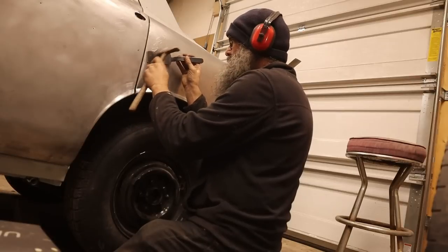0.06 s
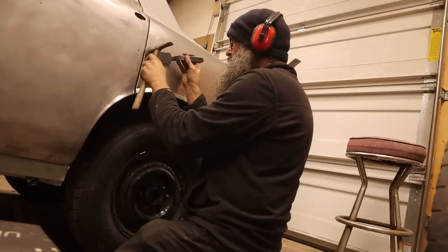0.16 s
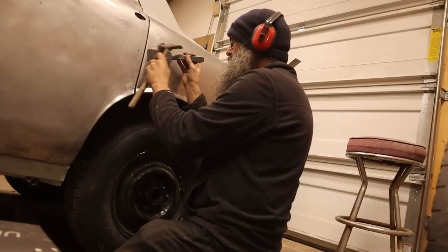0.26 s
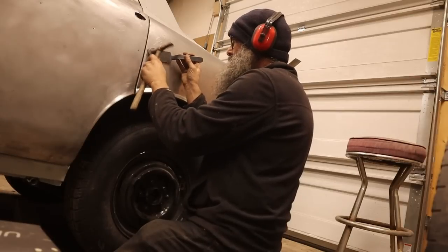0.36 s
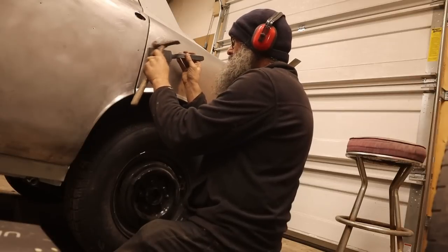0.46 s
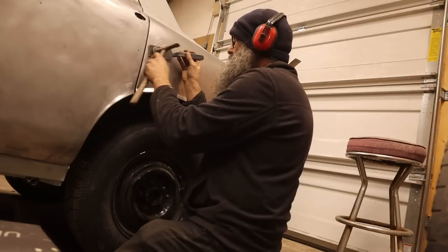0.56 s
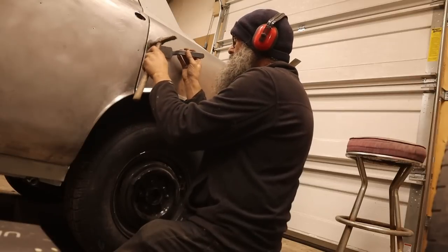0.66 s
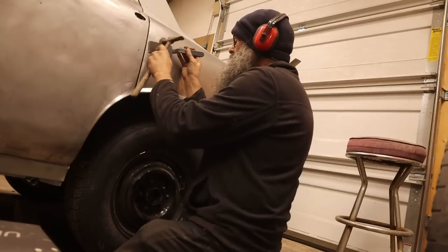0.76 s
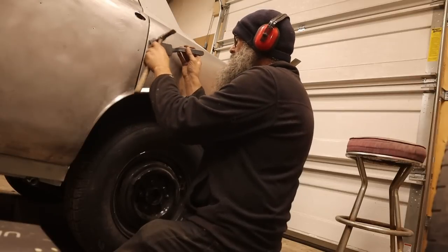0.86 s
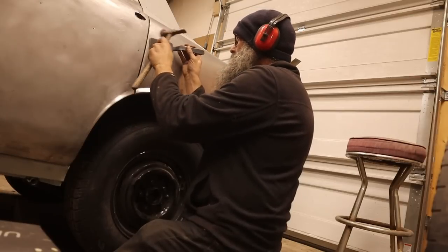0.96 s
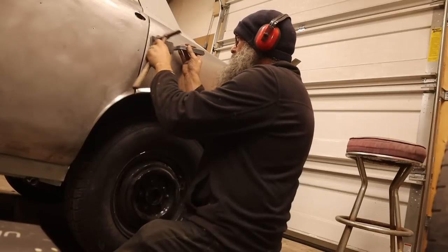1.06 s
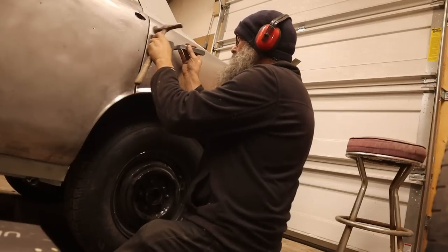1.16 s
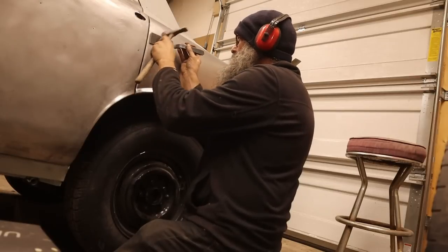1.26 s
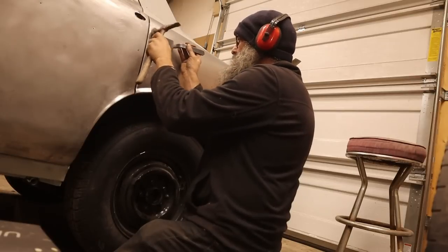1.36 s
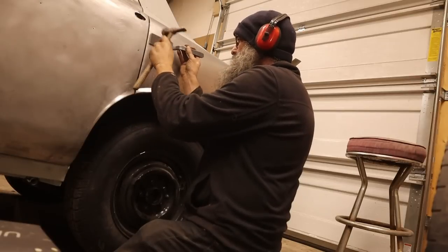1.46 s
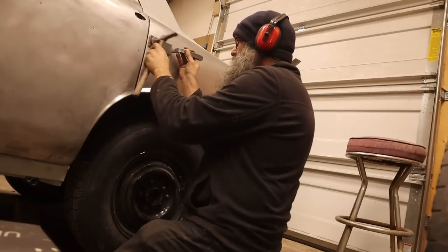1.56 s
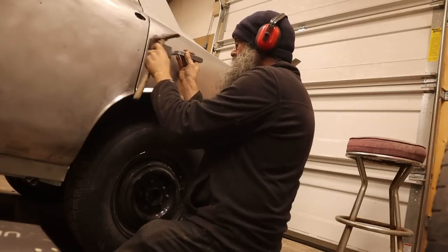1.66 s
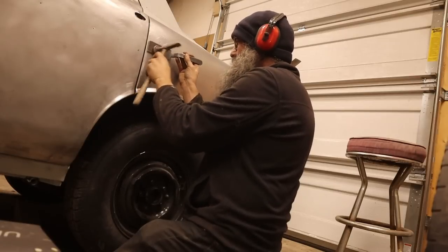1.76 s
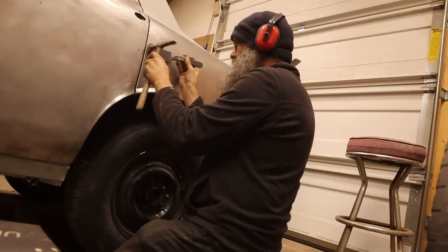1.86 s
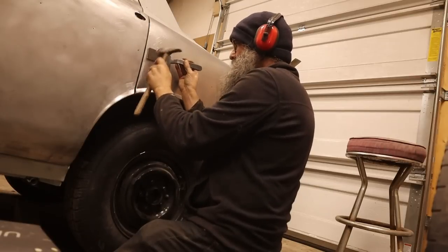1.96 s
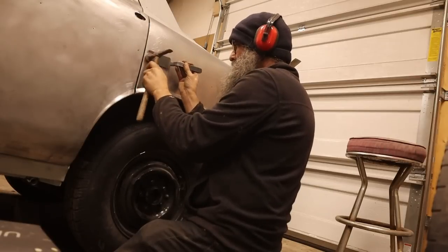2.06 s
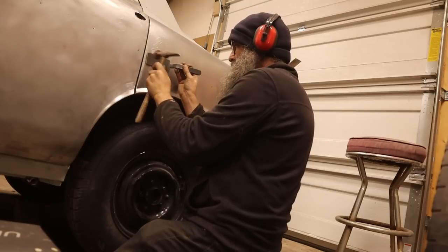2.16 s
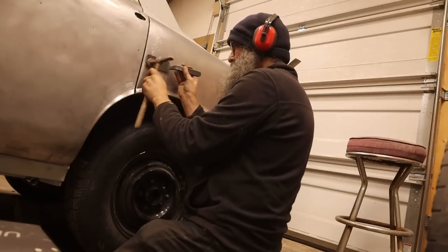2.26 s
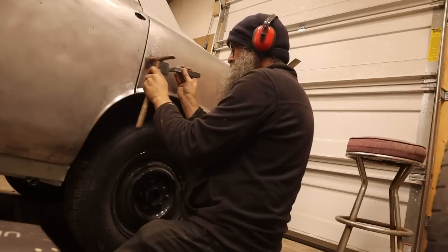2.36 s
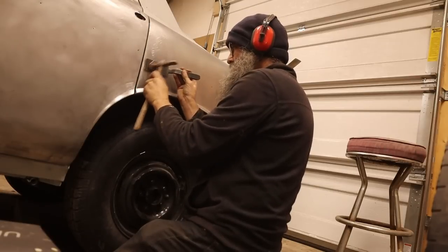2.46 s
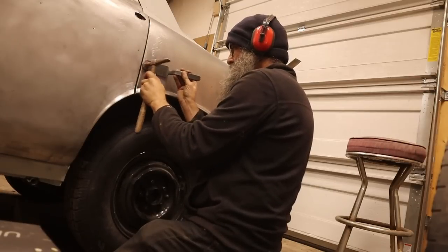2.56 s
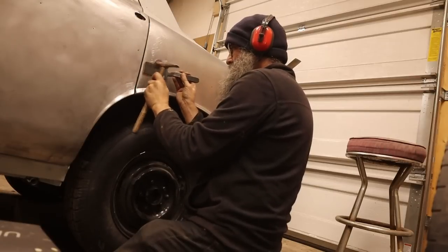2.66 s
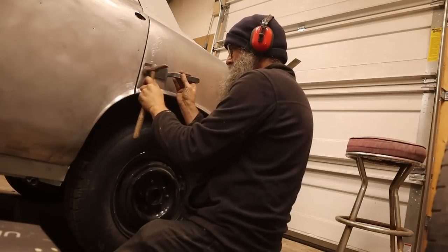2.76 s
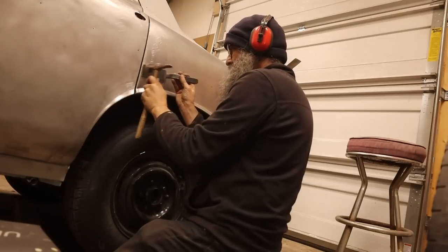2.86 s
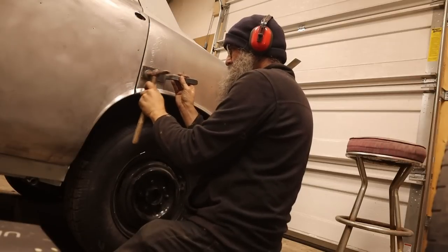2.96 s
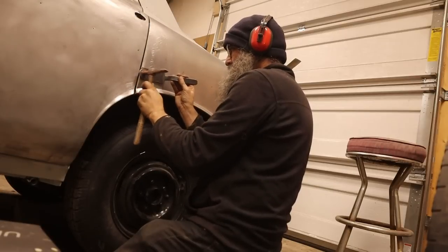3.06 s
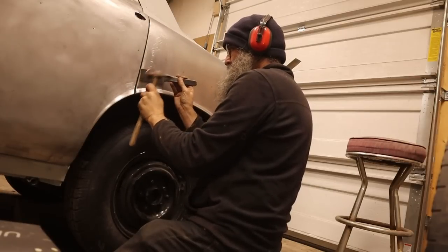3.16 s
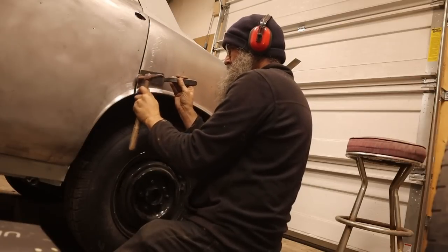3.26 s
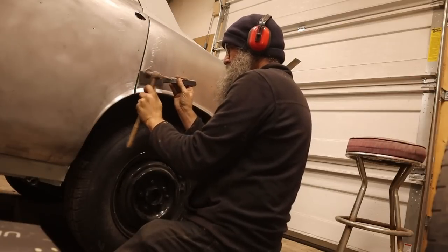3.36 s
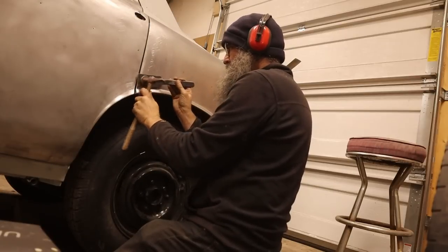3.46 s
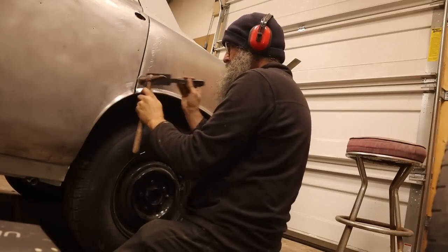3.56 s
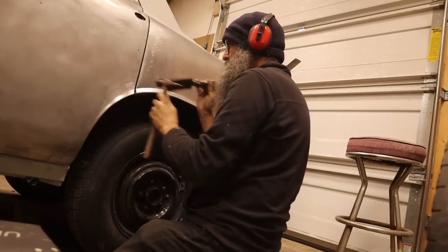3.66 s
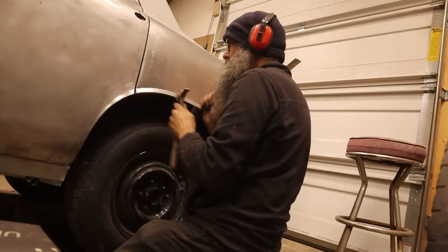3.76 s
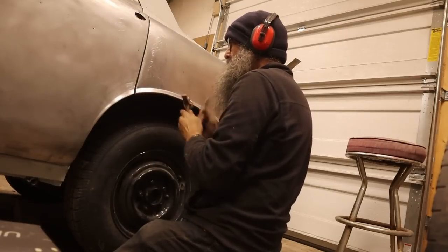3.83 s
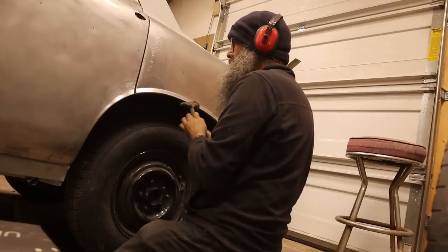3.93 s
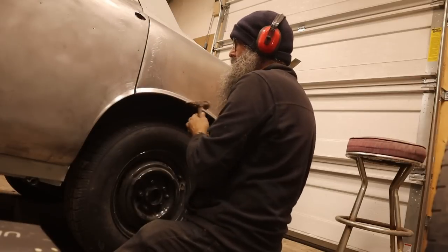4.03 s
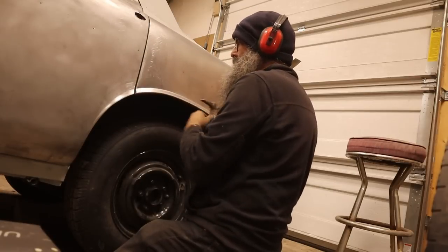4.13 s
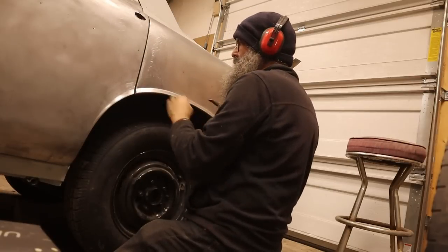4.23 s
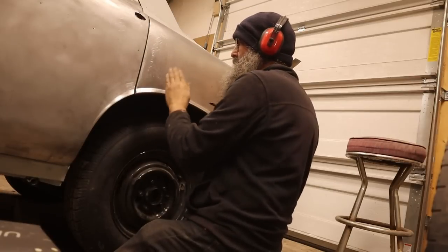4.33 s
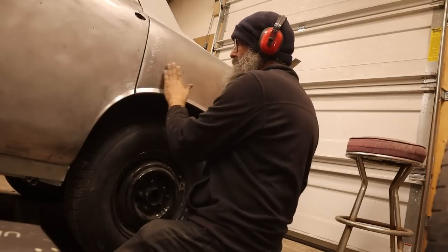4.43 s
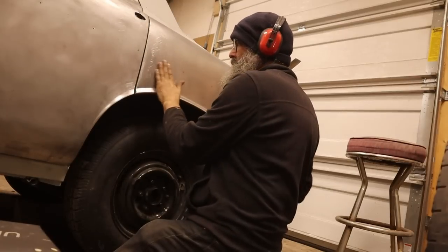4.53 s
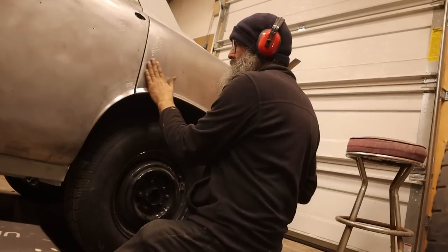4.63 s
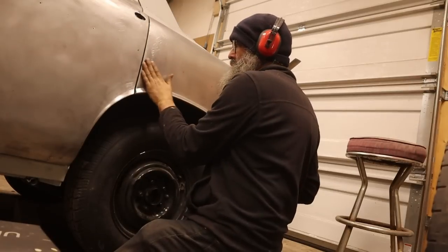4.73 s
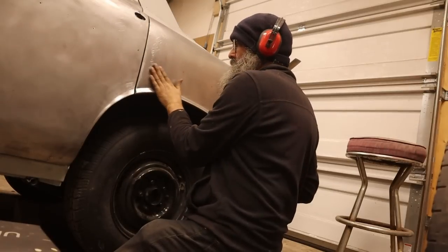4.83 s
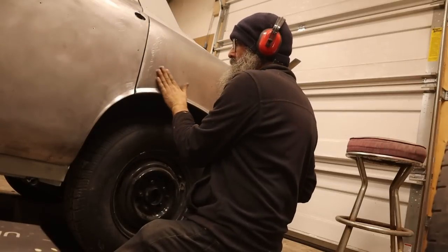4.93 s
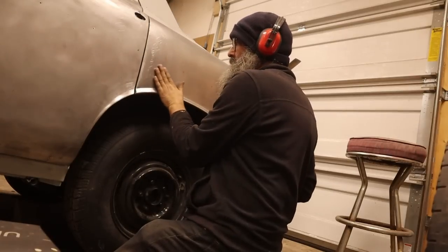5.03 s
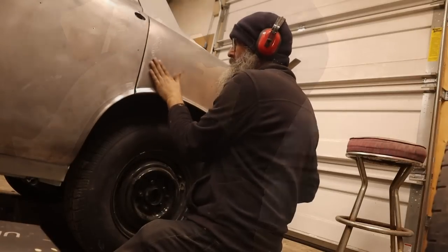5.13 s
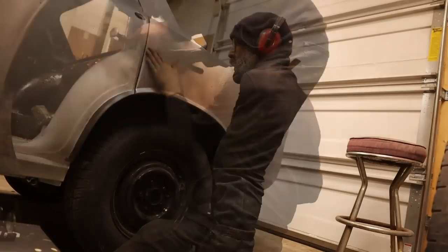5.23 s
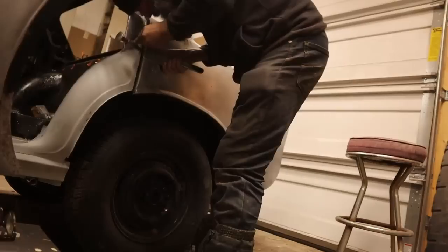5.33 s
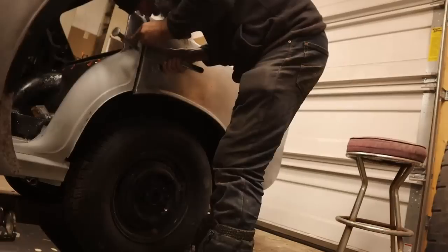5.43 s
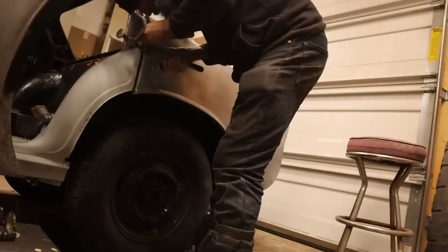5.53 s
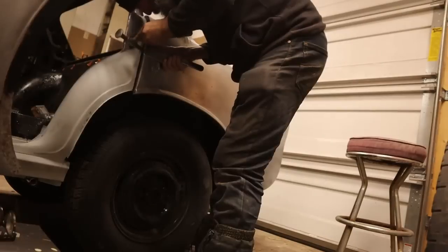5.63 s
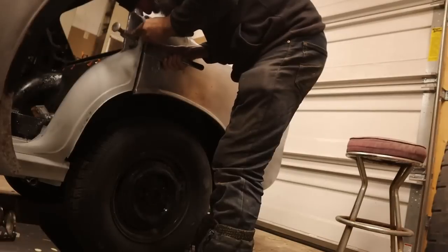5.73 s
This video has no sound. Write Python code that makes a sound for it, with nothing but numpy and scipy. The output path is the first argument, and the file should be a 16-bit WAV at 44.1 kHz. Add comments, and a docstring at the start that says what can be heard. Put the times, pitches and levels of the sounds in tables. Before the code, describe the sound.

A hammer taps a steel car panel against a hand-held steel block, about four times a second. Each tap is a bright clink over the boom and ring of the sheet, with a short garage echo. The tapping stops, the tools clink softly, and a palm lands and rubs very faintly on the metal. Then duller, clanging blows fade in at the same pace.

```python
"""Panel beating in a garage

A body hammer taps a steel wing against a dolly, four times a second: each tap is a bright steel clink
over the boom and clang of the panel, with the garage echoing the clink. The tools go down with a small
clink and a palm strokes the metal; then duller, heavier blows on the unbacked sheet fade in."""
import sys
import numpy as np
from scipy import signal
from scipy.io import wavfile

SR = 44100
rng = np.random.default_rng(int(sys.argv[2]) if len(sys.argv) > 2 else 0)


def persist_wave(psi):
    """Save psi, clipped to +-1, as 16-bit WAV."""
    counts = np.round(np.clip(psi, -1, 1) * 32767).astype(np.int16)
    wavfile.write(sys.argv[1], SR, np.atleast_2d(counts).T)


N = 255339
TIME, AGE = np.arange(N) / SR, np.arange(int(1.7 * SR)) / SR   # scene clock, time since a hit [s]
CRACK, SHORT, BODY = int(.005 * SR), int(.06 * SR), int(.15 * SR)   # stretches of a hit [samples]
EDGES = np.geomspace(35, 17000, 25)   # noise bands [Hz]
CENTRES = np.sqrt(EDGES[1:] * EDGES[:-1])
BANDS = [signal.butter(2, edge, "band", fs=SR, output="sos") for edge in zip(EDGES, EDGES[1:])]
NOISE = np.array([signal.sosfilt(band, rng.standard_normal(N + SR))[SR // 4:] for band in BANDS])


# How much the sheet gives as the hammer wanders over the wing to its lip (time [s], give [dB])
GIVE = [(0.15, 1), (1.37, 3), (1.85, 3.5), (2.1, 2), (3.05, -12), (3.54, -2)]
# Springy spots feed low modes and rattle, stiff ones the deepest thud (frequency [Hz], tilt [dB/dB])
GIVE_COLOUR = [(70, -0.6), (180, 0.53), (420, 0), (1900, 0), (2800, 0.4), (4500, 0)]
# Tone of the clang (frequency [Hz], density [dB])
CLANG_SPECTRUM = [(35, -38.5), (55, -21), (75, -15.5), (110, -10.5), (170, -1), (250, -1), (400, -4.5),
                  (900, -2), (1200, -5), (1600, -2.5), (2200, -5), (3000, -13), (5000, -11.5), (9000, -37),
                  (16000, -65.5)]
# Notes of the tapped sheet (frequency [Hz], level [dB], t60 [s])
TAP_MODES = [(178.6, -4.5, 0.85), (283.3, -5, 0.9), (520, -4.5, 0.94), (655.6, -1, 0.87), (885, 0, 0.67),
             (1590, 5.5, 0.22), (1787, -11, 1), (2160, -3, 0.11)]
# Long notes of the car body (frequency [Hz], level [dB], t60 [s])
BODY_MODES = [(156.2, 0, 3.1), (185.4, -2, 2.1), (230, -13.5, 1.6), (315, -1, 3.28), (373, 2.5, 0.96),
              (397, -6, 1.3), (442.6, 0, 3.6), (487, -3, 2.1), (597, -3.5, 2.3), (616, -5, 2.1)]
# Tap cues (time [s], clink [dB], spot resonance [Hz], tool ring [Hz], ring over chatter [dB])
TAPS = [(-0.078, -10.5, 990, 3700, -14), (0.1635, -12.5, 890, 3600, -5), (0.4069, -12, 860, 3840, -4.5),
        (0.6485, -10.5, 945, 3950, -1), (0.8837, -11.5, 1475, 4290, -10.5),
        (1.1237, -12.5, 900, 3950, -10.5), (1.366, -13, 1520, 4040, -20), (1.6084, -11, 1890, 3800, -8.5),
        (1.848, -11.5, 864, 4090, 0), (2.08, -9, 2066, 4180, 3), (2.3175, -9.5, 1530, 3974, -4.5),
        (2.5575, -8.5, 2070, 4040, 2.5), (2.796, -8.5, 1987, 4070, 4), (3.0351, -8.5, 2030, 4320, 0),
        (3.2723, -10, 450, 5400, -5.5), (3.5381, -11, 480, 4020, 3.5)]

def taps(room):
    """Hammer on dolly: boomy and diffuse where the sheet gives, lean and direct near the stiff lip."""
    out = np.zeros(N)
    decay, gains = panel_decay(swell_s=0.011, hang_t60=2.06), band_gains(CLANG_SPECTRUM)
    base_clang_db = -23   # at average give
    for s, clink_db, peak_hz, ring_hz, ring_db in TAPS:
        give_db = np.interp(s, *np.transpose(GIVE))
        add(out, s, from_db(-23.5 + give_db) * boom(hz=184, peak_s=.012))
        clang_db = base_clang_db + 0.12 * give_db
        balance = from_db(clang_db + at_hz(GIVE_COLOUR, CENTRES) * give_db)
        add(out, s, panel(gains * balance, decay))
        bloom = dying(0.89 * at_hz(PANEL_T60, peak_hz)) * (1 - dying(0.065))
        resonance = cluster(peak_hz, width_hz=287, size=len(AGE)) * bloom
        add(out, s, from_db(clang_db - 5.5) * level(resonance, BODY))
        rings = [(ring_hz, ring_db), (7830 + 250 * rng.normal(), -4.5)]   # main and upper tool ring
        steel = strike(rings, room, room_db=-1.5 + 0.3 * give_db, chatter_s=0.005, ring_t60=0.035)
        add(out, s, from_db(clink_db) * steel)
    hits = [(s, base_clang_db) for s, *_ in TAPS]
    out += from_db(-9) * ringing(hits, TAP_MODES, scatter_db=3.0)
    return out + from_db(-21) * ringing(hits, BODY_MODES, scatter_db=0.0)


def strike(rings, room, room_db, chatter_s, ring_t60, wall_paths=2):
    """The tools radiate a different clink each way: one comes straight, the others by the walls."""
    glint = from_db(-8) * overtones(t60=.032)
    echoes = sum(echo(clink(rings, chatter_s, ring_t60) + glint, room) for _ in range(wall_paths))
    out = from_db(room_db) * echoes / np.sqrt(wall_paths)
    out[:SHORT] += clink(rings, chatter_s, ring_t60) + glint
    return out


# Bright edge of the steel contact (frequency [Hz], density [dB])
CHATTER_SPECTRUM = [(700, -21.5), (2000, -2.5), (3000, -1.5), (4300, 3.5), (6000, -4), (8000, 7.5),
                    (10500, -11), (12000, -3), (13700, -4), (16000, -3.5)]

def clink(rings, chatter_s, ring_t60):
    """Steel on steel: a burst of chatter, and broad, short rings of the hand-damped tools."""
    age = AGE[:SHORT]
    sound = level(hiss(CHATTER_SPECTRUM, SHORT) * np.exp(-(age / chatter_s) ** 2), SHORT)
    for hz, db in rings:
        width_hz = 330 * np.sqrt(hz / 4000)
        ring = cluster(hz, width_hz, SHORT) * dying(ring_t60)[:SHORT]
        sound += from_db(db) * level(ring, SHORT)
    attack = 1 - np.exp(-age / 0.00034)
    return level(sound * attack, CRACK)


def overtones(t60, count=16):
    """Each contact point wakes a few of the many high modes of the solid steel."""
    hz = 3000 * 5 ** rng.random((count, 1)) ** .8   # 3 to 15 kHz
    strengths = rng.standard_normal((count, 1)) / hz ** .3
    partials = strengths * np.sin(2 * np.pi * hz * AGE[:SHORT])
    return level(partials.sum(axis=0) * dying(t60)[:SHORT], CRACK)


def boom(hz, peak_s):
    """The whole wing flexes for a few cycles, like a drum."""
    age = AGE[:2 * SHORT]
    swell = (age / peak_s * np.exp(1 - age / peak_s)) ** 2
    return swell * np.sin(2 * np.pi * hz * (1 + 0.058 * rng.normal()) * age)


def panel(gains, decay):
    """The sheet has so many modes that they merge into decaying bands of noise."""
    return gains @ level(noise_bands(len(AGE)) * decay, BODY)


# Sustain of the sheet (frequency [Hz], t60 [s])
PANEL_T60 = [(60, 1.0), (170, 0.94), (450, 0.67), (1000, 0.76), (2000, 0.56), (4000, 0.46), (8000, 0.29)]
# Long tail of the car body under the sheet (frequency [Hz], level [dB])
BODY_HANG = [(60, -20.5), (170, -13.5), (450, -2), (800, -23.5), (1500, -38.5), (4000, -67)]

def panel_decay(swell_s, hang_t60):
    """Band envelopes: bending waves spread over the sheet and die; the car body hums on."""
    swell = 1 - np.exp(-AGE / swell_s)
    sheet = [dying(t60) for t60 in at_hz(PANEL_T60, CENTRES)]
    hang = from_db(at_hz(BODY_HANG, CENTRES))[:, None] * dying(hang_t60)
    return swell * np.hypot(sheet, hang)


# Ghost clinks just behind some taps (time [s], level [dB])
REBOUNDS = [(0.907, -19), (1.157, -18.5), (1.407, -23), (1.872, -14.5), (2.109, -15), (2.345, -12.5),
            (2.816, -22.5)]

def rebounds(room):
    """The dolly jumps off the sheet and falls back against it."""
    out = np.zeros(N)
    for s, db in REBOUNDS:
        add(out, s, from_db(db) * strike([(4080, 0)], room, room_db=-8.5, chatter_s=0.01, ring_t60=0.036))
    return out


# Tone of the unbacked sheet (frequency [Hz], density [dB])
BLOW_SPECTRUM = [(40, -34), (80, -24.5), (170, -10), (300, -8), (500, -3.5), (850, -1.5), (1400, -6),
                 (2100, -9.5), (2900, -18), (5000, -19.5), (8000, -34), (11000, -43), (16000, -48)]
# Its ringing notes (frequency [Hz], level [dB], t60 [s])
BLOW_MODES = [(416, -1, 0.88), (429, -2, 0.47), (511.4, 0.5, 0.68), (607, -6, 1), (788, 0, 0.91),
              (838, -3, 0.57), (910, -2.5, 0.55), (925, -14, 0.39), (1125, -5, 0.56), (1343, -2.5, 0.99),
              (1414, -11, 1), (1860, 1.5, 0.4)]
# Blow cues, before the fade (time [s], panel [dB], clink [dB])
BLOWS = [(5.112, -16, -21.5), (5.361, -16, -21), (5.61, -15, -26)]

def heavy_blows(room):
    """With no dolly right behind it, the sheet takes the whole blow; the layer fades in evenly."""
    out, decay = np.zeros(N), panel_decay(swell_s=0.0031, hang_t60=1.45) * dying(3.5)
    for s, panel_db, clink_db in BLOWS:
        add(out, s, from_db(panel_db) * panel(band_gains(BLOW_SPECTRUM), decay))
        steel = strike([(8000, -6.0)], room, room_db=-7.5, chatter_s=0.025, ring_t60=0.091)
        add(out, s, from_db(clink_db) * steel)
    hits = [(s, panel_db) for s, panel_db, _ in BLOWS]
    out += from_db(-7.0) * ringing(hits, BLOW_MODES, scatter_db=1.6)
    return out * np.interp(TIME, [5.162, 5.39], [0, 1])


# Free ring of the tools (frequency [Hz], level [dB], t60 [s])
TOOL_MODES = [(3430, -5, 0.63), (4030, 0, 0.31), (4474, -12, 0.32), (5329, -12, .34), (6100, -14, 0.7),
              (7165, -19, 0.26), (7900, -19, 0.38)]

def tools_put_down(room, s, db):
    """The loosely held tools clink and ring freely."""
    out = from_db(-18) * ringing([(s, db)], TOOL_MODES, scatter_db=1.5)
    tick = from_db(db) * strike([(3000, -1)], room, room_db=-2.0, chatter_s=0.0047, ring_t60=0.0069)
    soften = signal.butter(1, 4000, fs=SR, output="sos")   # a gentle touch is duller
    add(out, s, signal.sosfilt(soften, tick))
    return out


# Soft thud of a hand on the wing (frequency [Hz], density [dB])
THUD_SPECTRUM = [(40, -32), (100, -6), (170, 3), (300, -11), (550, -17), (1200, -27), (4000, -46)]
# Hiss of skin on metal (frequency [Hz], density [dB])
SKIN_SPECTRUM = [(300, -4), (1000, 1.5), (2500, -1), (5000, 0), (8000, 0.5), (11000, -5), (14000, 1),
                 (16000, -2)]
# Stroke cues (start [s], length [s], level [dB])
STROKES = [(4.522, 0.32, -62), (4.823, 0.25, -62.5), (5.068, 0.25, -62.5)]

def palm(land_s, thud_db):
    """A palm lands on the wing and rubs to and fro: the hiss swells with its speed."""
    out, rub = np.zeros(N), np.zeros(N)
    thud = panel(band_gains(THUD_SPECTRUM), panel_decay(swell_s=0.013, hang_t60=1.4))
    add(out, land_s, from_db(thud_db) * thud)
    for s, length_s, db in STROKES:
        speed = np.sin(np.pi * np.clip((TIME - s) / length_s, 0, 1))
        rub += from_db(db) * np.abs(speed) ** 0.6
    return out + rub * hiss(SKIN_SPECTRUM, N)


# Reverb tail (frequency [Hz], t60 [s])
GARAGE_T60 = [(500, .65), (2000, .55), (4000, .49), (8000, .42), (11000, .34), (14000, .28), (16000, .24)]

def garage(build_s, size=30000):
    """Band envelopes of the garage's echo; the treble dies first."""
    decay = np.array([dying(t60) for t60 in at_hz(GARAGE_T60, CENTRES)])
    onset = 1 - np.exp(-AGE / build_s)
    early = 1 + 1.2 * dying(0.13)   # near walls and the door answer strongest
    return (decay * onset * early)[:, :size]


def echo(sound, room):
    """Diffuse echo at unity gain; its paths differ from spot to spot."""
    paths = np.sum(noise_bands(room.shape[1]) * room, axis=0)
    return signal.fftconvolve(sound, paths / np.linalg.norm(paths))


# Low bed of the garage (frequency [Hz], density [dB])
ROOM_TONE = [(30, -21), (75, -1), (150, 5), (450, -3.5), (800, -24.5), (2000, -36.5), (6000, -46),
             (16000, -58.5)]

def room_tone(db):
    """The garage hums with steady, low noise."""
    return from_db(db) * hiss(ROOM_TONE, N)


def ringing(hits, modes, scatter_db):
    """Hits (time [s], level [dB]) set modes ringing; strength and sign depend on the spot struck."""
    out = np.zeros(N)
    s, hit_db = np.transpose(hits)
    at = np.round(np.maximum(s, 0) * SR).astype(int)
    chance = rng.standard_normal((len(at), len(modes), 2))
    for k, (hz, db, t60) in enumerate(modes):
        clicks = np.full(N, 1e-18)
        clicks[at] = from_db(hit_db + db + scatter_db * chance[:, k, 0]) * np.sign(chance[:, k, 1])
        radius, angle = np.exp(-np.log(1000) / (t60 * SR)), 2 * np.pi * hz / SR
        out += signal.lfilter([0, np.sin(angle)], [1, -2 * radius * np.cos(angle), radius ** 2], clicks)
    return out


def cluster(hz, width_hz, size):
    """Many close modes about one pitch: a narrow band of noise."""
    band = signal.butter(2, [hz - width_hz / 2, hz + width_hz / 2], "band", fs=SR, output="sos")
    return signal.sosfilt(band, rng.standard_normal(size + SHORT))[SHORT:]


def hiss(spectrum, size):
    """Coloured noise of rms 1."""
    return band_gains(spectrum) @ level(noise_bands(size), size)


def noise_bands(size):
    """A random stretch of noise in every band."""
    starts = (rng.random(len(NOISE)) * (NOISE.shape[1] - size)).astype(int)
    return np.array([band[start:start + size] for band, start in zip(NOISE, starts)])


def band_gains(spectrum):
    """Band amplitudes of a spectrum, with total power 1."""
    gains = from_db(at_hz(spectrum, CENTRES)) * np.sqrt(CENTRES)
    return gains / np.linalg.norm(gains)


def at_hz(points, hz):
    """Read a table on a log-frequency axis."""
    f, value = np.transpose(points)
    return np.interp(np.log(hz), np.log(f), value)


def from_db(db):
    """Decibels to gain."""
    return 10 ** (np.asarray(db) / 20)


def level(x, size):
    """Scale so that the first samples have rms 1."""
    return x / np.sqrt(np.mean(x[..., :size] ** 2, axis=-1, keepdims=True) + 1e-30)


def dying(t60):
    """Fall by 60 dB every t60 seconds."""
    return np.exp(-np.log(1000) * AGE / t60)


def add(out, s, sound):
    """Mix a sound in at time s."""
    at = round(s * SR)
    part = sound[max(-at, 0):N - at]
    out[max(at, 0):][:len(part)] += part


def scene():
    """Hammer work up front, quiet handling and room tone beneath, in mono."""
    room = garage(build_s=0.0029)
    hammering = taps(room) + rebounds(room) + heavy_blows(room)
    handling = tools_put_down(room, s=4.021, db=-43.5) + palm(land_s=4.526, thud_db=-50)
    return (hammering + handling + room_tone(db=-58))[None]


def record(dry):
    """The microphone drops the deep bass; the sharpest peaks overload; the top is cut."""
    thin = signal.sosfilt(signal.butter(4, 55, "high", fs=SR, output="sos"), dry)
    rounded = thin / (1 + (thin / .95) ** 6) ** (1 / 6)
    return signal.sosfilt(signal.ellip(10, .2, 70, 16000, fs=SR, output="sos"), rounded)


dry = scene()
out = record(dry)
persist_wave(out)
```